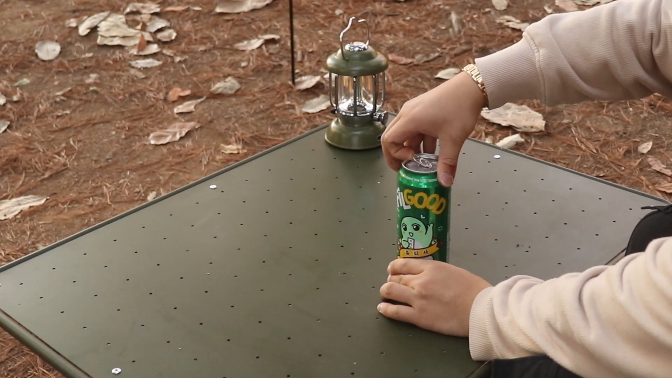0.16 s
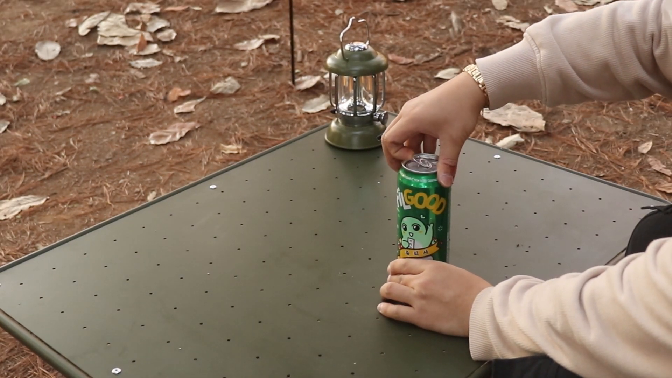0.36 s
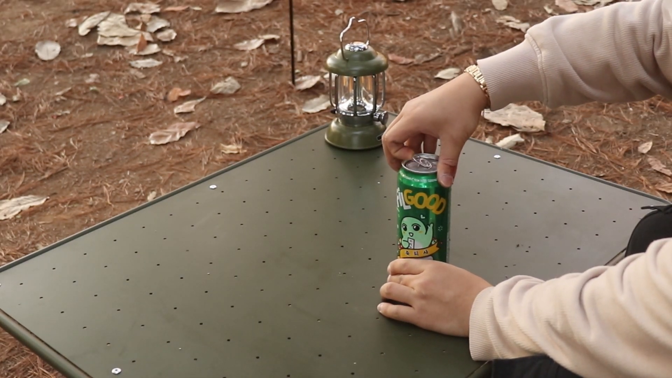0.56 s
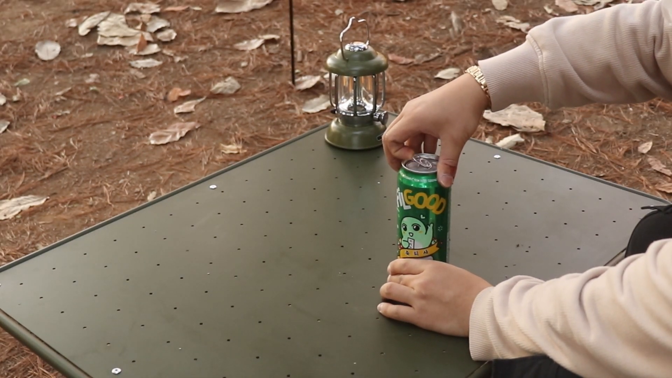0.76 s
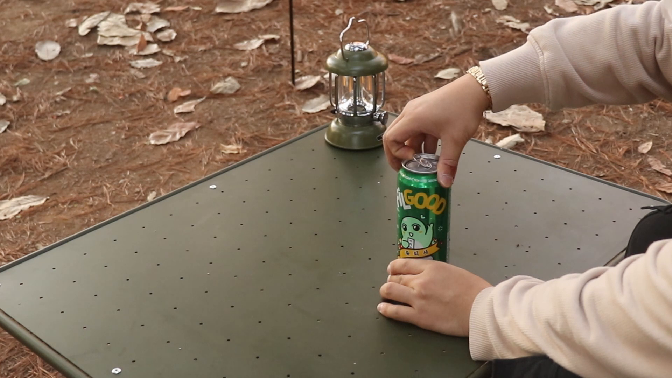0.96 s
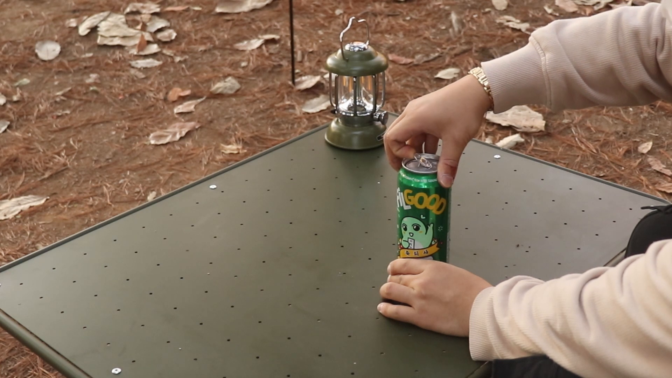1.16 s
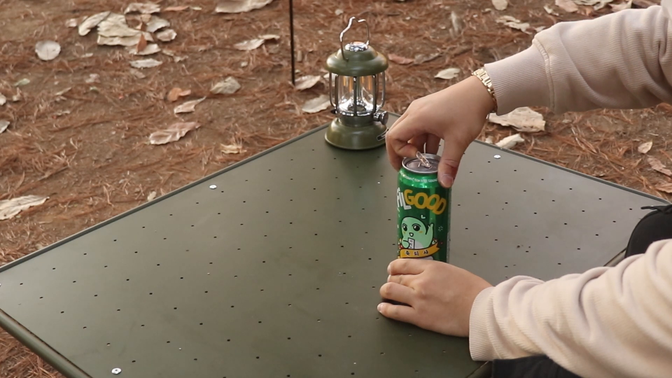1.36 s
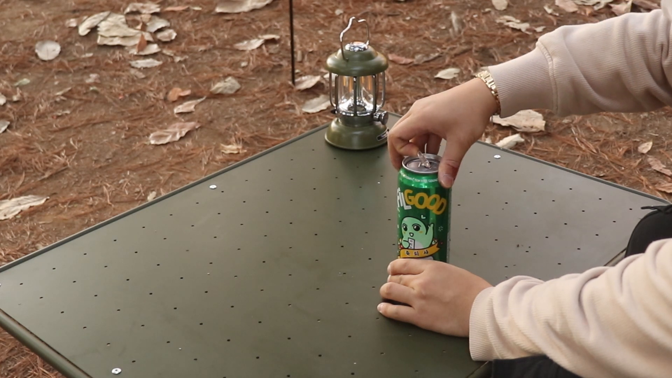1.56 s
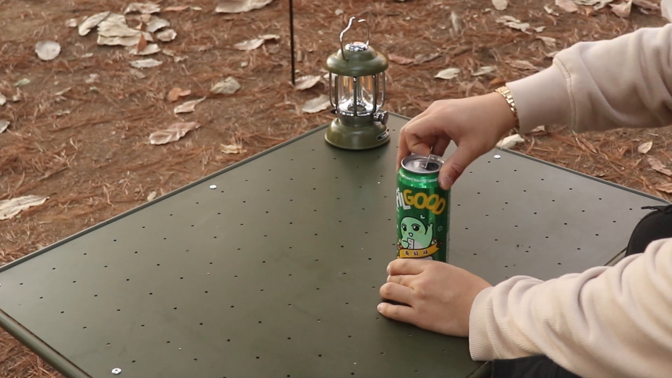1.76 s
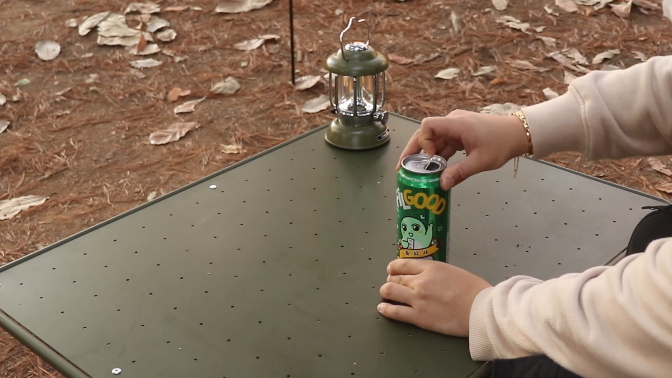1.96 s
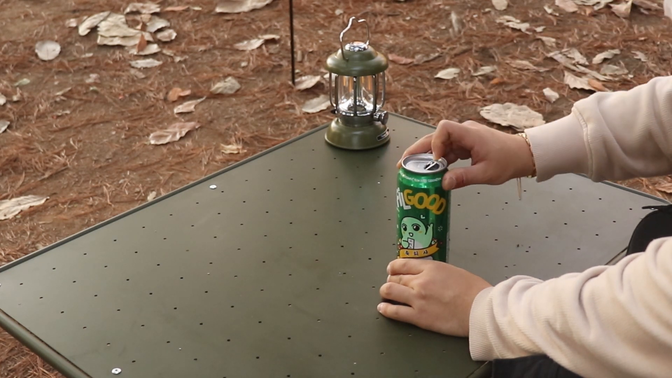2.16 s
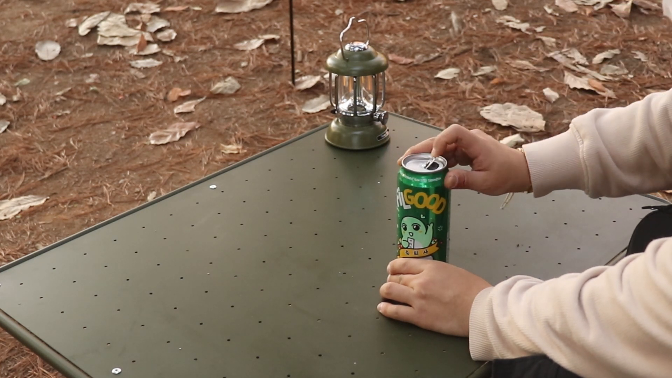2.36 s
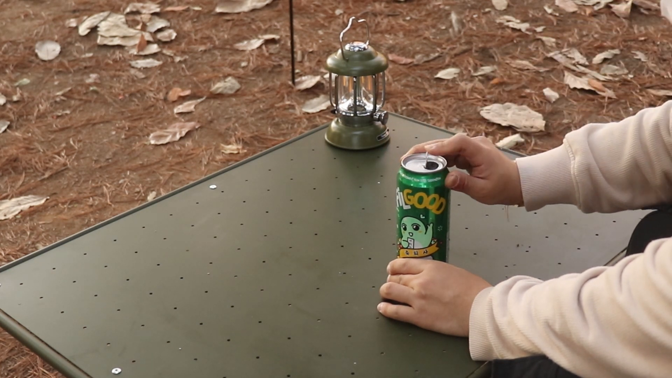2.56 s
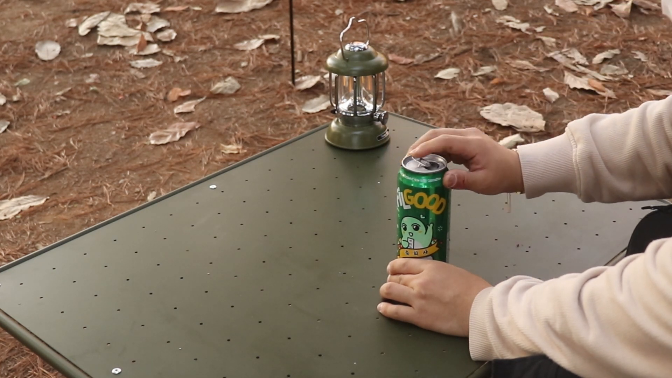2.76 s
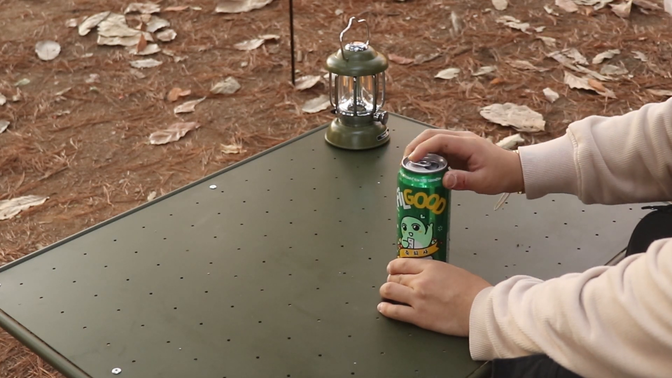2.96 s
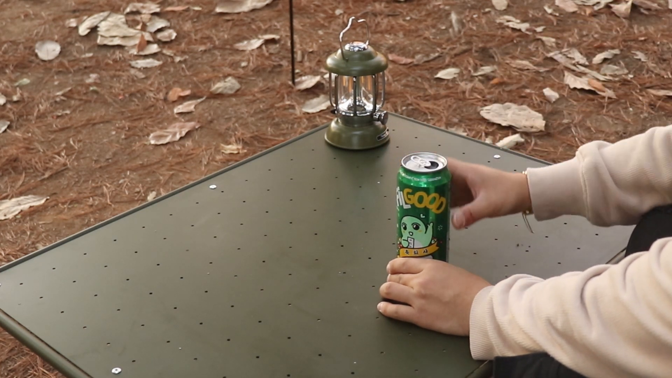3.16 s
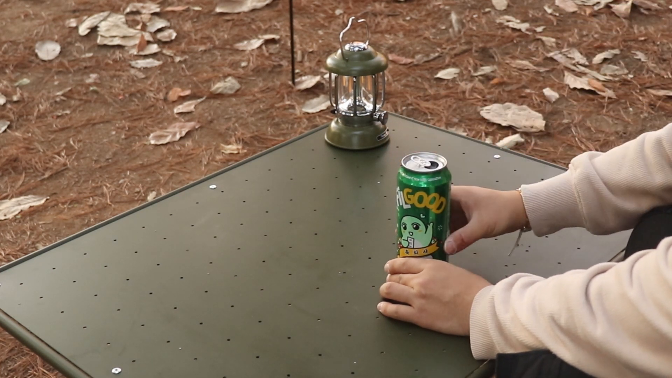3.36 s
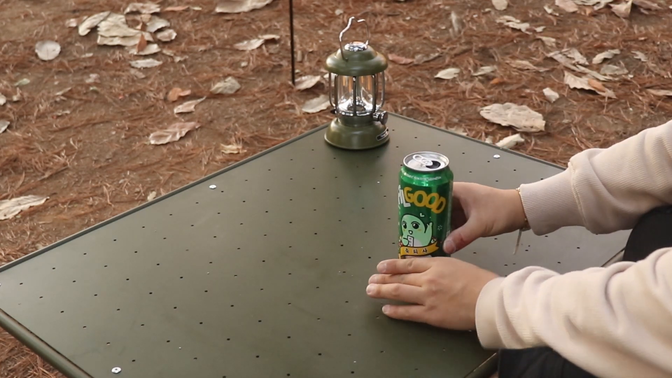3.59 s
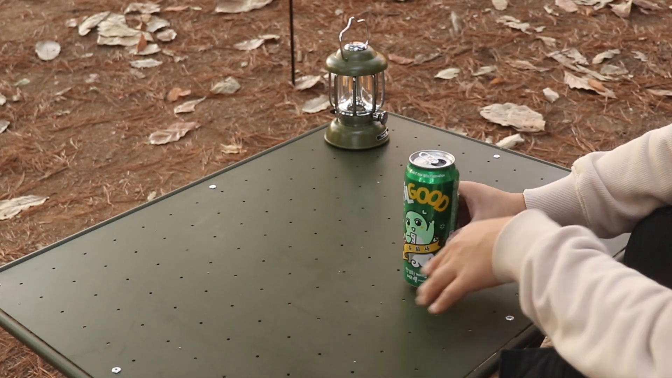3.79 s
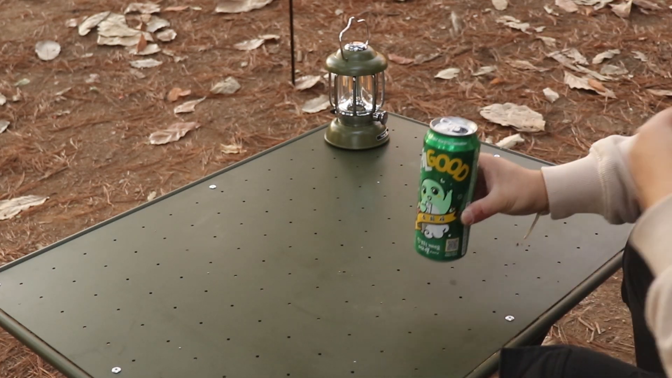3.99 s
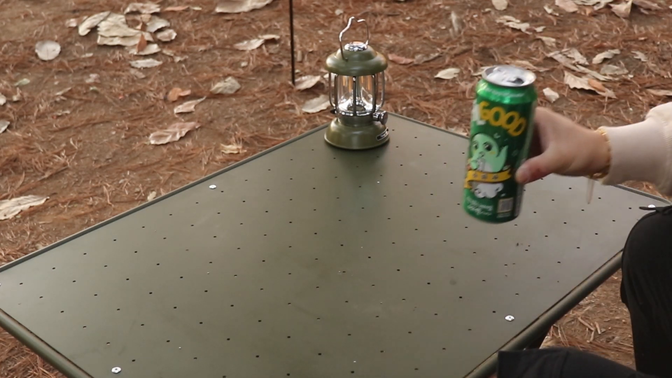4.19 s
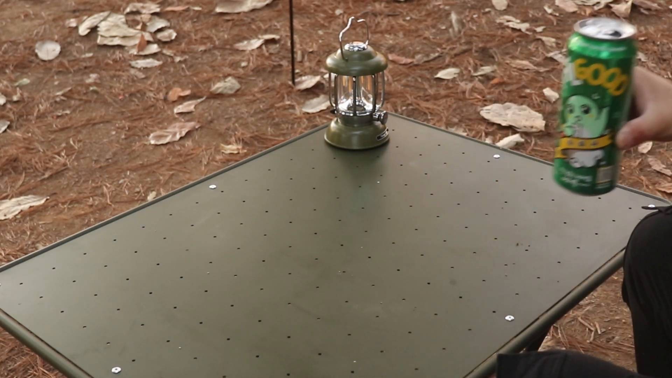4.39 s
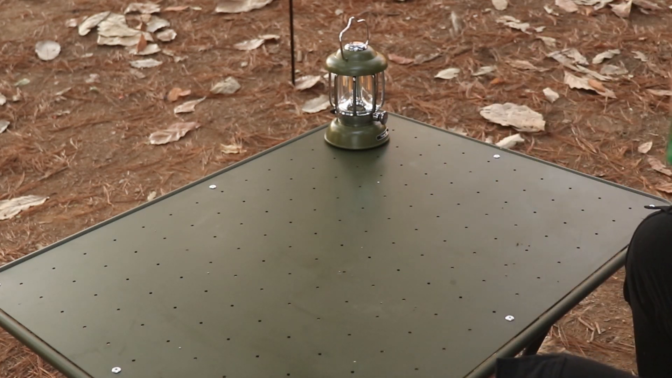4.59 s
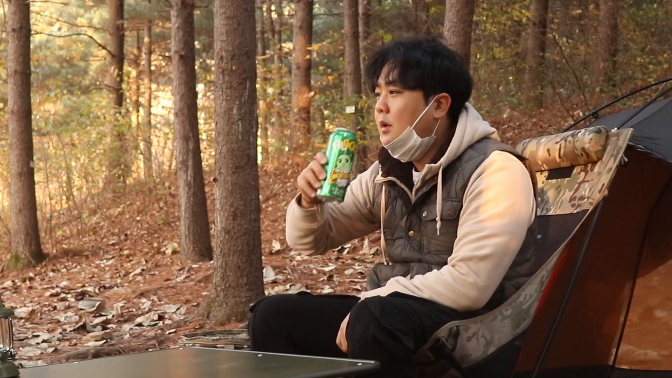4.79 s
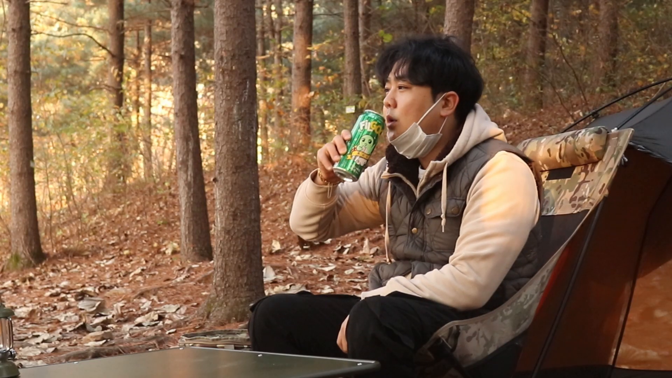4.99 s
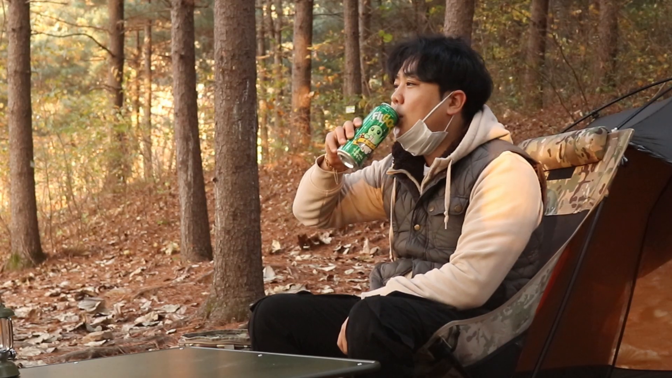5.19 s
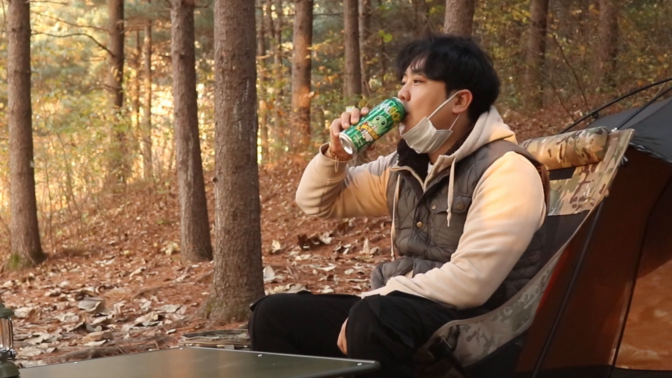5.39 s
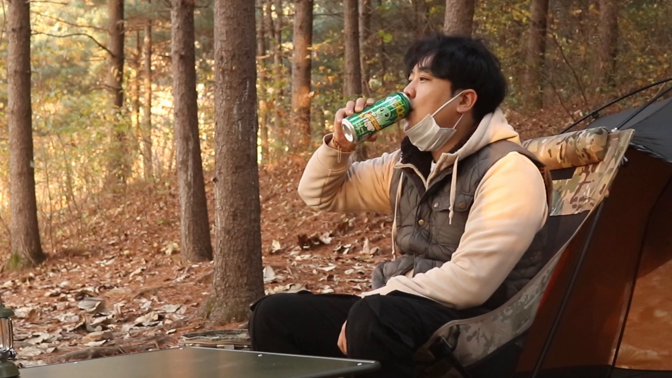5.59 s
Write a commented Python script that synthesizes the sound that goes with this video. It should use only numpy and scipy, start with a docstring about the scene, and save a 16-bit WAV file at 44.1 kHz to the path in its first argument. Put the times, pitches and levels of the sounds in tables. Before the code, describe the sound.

Close, dry can opening: short gas spurt and pop, metallic ticks, a second hard crack, then faint sleeve rustle and distant birds.

```python
"""A drink can is opened on a camp table in a pine wood: the seal cracks, gas hisses out and the lid pops.
Bursts of tiny fractures ring the lid, shaped noise makes the gas jet, and fading tones thump and ring.
The ring-pull ticks as it is levered up, the flap tears open, a sleeve rustles in soft noise, a fingertip knocks.
Small birds whistle gliding tones among echoing trees, over a distant rush and a breeze made of noise.
Near the end the sound cuts to a calmer background."""
import sys
import numpy as np
from scipy import signal
from scipy.fft import rfft, irfft
from scipy.io import wavfile

SR = 44100
rng = np.random.default_rng(int(sys.argv[2]) if len(sys.argv) > 2 else 0)


def store_wav(level_fs):
    """Save 16-bit WAV to argv[1]."""
    pcm = np.round(np.clip(np.atleast_2d(level_fs), -1, 1) * 32767)
    wavfile.write(sys.argv[1], SR, pcm.T.astype(np.int16))


N = 248724
TIME = np.arange(N) / SR


def from_db(db):
    """Turn decibels into a factor that multiplies the sound."""
    return 10 ** (np.asarray(db) / 20)


def rms_one(x):
    """Scale a sound to an average power of one."""
    return x / np.sqrt(np.mean(x ** 2) + 1e-20)


def curve(rows):
    """Join (time_s, value) rows by straight lines."""
    return np.interp(TIME, *np.transpose(rows))


def at_hz(points, hz):
    """Read a (pitch_hz, value) table between its points, with pitch on a log scale."""
    freqs, values = np.transpose(points)
    return np.interp(np.log(np.maximum(hz, 1)), np.log(freqs), values)


def add(out, start_s, sound):
    """Mix a sound in at its start time."""
    start = round(start_s * SR)
    out[start:start + len(sound)] += sound[:len(out) - start]


def fade(t, t60):
    """Die away smoothly, falling by 60 dB in t60 seconds."""
    return np.exp(-np.log(1000) * t / t60)


def noise(spectrum):
    """Steady noise of a given colour, with an average power of one."""
    hz = np.fft.rfftfreq(N, 1 / SR)
    colour = from_db(at_hz(spectrum, hz))
    return rms_one(irfft(rfft(rng.standard_normal(N)) * colour, N))


def bell(x, hz, width_hz, gain_db):
    """Boost or cut around one frequency."""
    band = signal.lfilter(*signal.iirpeak(hz, hz / width_hz, fs=SR), x)
    return x + (from_db(gain_db) - 1) * band


def shelf(x, hz, kind, gain_db):
    """Boost or cut the low or the high end."""
    end = signal.lfilter(*signal.butter(1, hz, kind, fs=SR), x)
    return x + (from_db(gain_db) - 1) * end


def low_pass(x, order, hz):
    """Remove the sound above one frequency."""
    return signal.sosfilt(signal.butter(order, hz, fs=SR, output="sos"), x)


# colour of the distant rush, before its treble is softened: pitch_hz, relative_level_db (per Hz)
RUSH_COLOUR = [(160, -1), (250, -4), (350, -3.5), (550, -0.5), (800, -1.5), (1050, -7.0), (1400, -13),
               (2000, -20.0), (3000, -20.5), (4500, -18.5), (6000, -25.5), (8000, -27), (10000, -33),
               (15000, -34)]


def distant_rush(level_db=-43.5, treble_db=-3.0):
    """A steady far-off noise with softened treble."""
    return from_db(level_db) * shelf(noise(RUSH_COLOUR), 8000, "high", treble_db)


# strength of the breeze on the microphone: time_s, level_db
BREEZE_LEVEL = [(0.0, -32.5), (0.05, -37), (0.43, -33.5), (1.35, -42.5), (1.48, -35), (2.6, -44),
                (2.69, -38), (4.45, -38.5), (4.65, -35.5)]
# colour of its rumble: pitch_hz, relative_level_db (per Hz)
BREEZE_COLOUR = [(12, -4.5), (22, 1.5), (48, -2.5), (70, -7.5), (110, -14), (160, -30.5), (300, -55)]


def breeze():
    """Moving air rumbles on the microphone as noise of changing level."""
    return from_db(curve(BREEZE_LEVEL)) * noise(BREEZE_COLOUR)


# colour of the background after the cut: pitch_hz, relative_level_db (per Hz)
LATE_COLOUR = [(30, -6.5), (80, 0.5), (130, -0.5), (210, 0.5), (320, -4.5), (520, -4.0), (820, -2),
               (1100, -10), (1500, -18.0), (2200, -27), (4000, -29), (6500, -32), (10000, -34.0),
               (15000, -34.5)]


def background(cut_s=4.67, late_db=-45.5):
    """Rush and breeze play until a cut, 10 ms long, to a calmer steady noise."""
    late = np.clip((TIME - cut_s) / .01, 0, 1)
    early_sound = distant_rush() + breeze()
    return (1 - late) * early_sound + late * from_db(late_db) * noise(LATE_COLOUR)


def glide(length_s, start_hz, end_hz, bend=1.1):
    """The pitch of one slurred bird note, moving along a slight bend."""
    return start_hz + (end_hz - start_hz) * np.linspace(0, 1, round(length_s * SR)) ** bend


# chirps slur up and flick back down: start_s, rise_s, top_pitch_hz, level_db, flick_level_db
# (bird levels are those before flutter, swell and distance)
CHIRPS = [(0.011, .075, 5050, -49.5, -57), (0.479, 0.081, 4800, -53.5, -58),
          (0.962, 0.072, 5580, -50, -52.5), (1.216, 0.078, 4900, -55, -60),
          (1.413, 0.076, 5600, -53.5, -58), (1.96, 0.076, 4800, -55.5, -60), (2.19, .052, 5500, -56, -64),
          (2.207, 0.06, 4850, -50, -49.5), (2.451, 0.031, 5430, -51.5, -66), (2.552, .06, 4750, -45.5, -57),
          (2.764, .072, 4850, -53, -59), (2.957, 0.057, 4810, -48, -48.5), (3.1, .058, 4550, -55.5, -60),
          (3.44, 0.066, 4860, -49, -48)]


def chirps(from_hz=3530, flick_s=.024, flick_ratio=.8):
    """Each chirp is a rising note, then a short flick down to a share of the top pitch."""
    rises = [(start_s, glide(rise_s, from_hz, top_hz), level_db)
             for start_s, rise_s, top_hz, level_db, _ in CHIRPS]
    flicks = [(start_s + rise_s, glide(flick_s, top_hz, flick_ratio * top_hz), flick_db)
              for start_s, rise_s, top_hz, _, flick_db in CHIRPS]
    return rises + flicks


# lone falling notes: start_s, length_s, start_pitch_hz, level_db
FALLING_NOTES = [(2.515, .028, 5100, -50.5), (3.645, 0.041, 5050, -43.5), (5.449, .1, 6800, -68.5)]


def falling_notes(end_ratio=.8):
    """Single notes slide down to a share of their starting pitch."""
    return [(start_s, glide(length_s, hz, end_ratio * hz), level_db)
            for start_s, length_s, hz, level_db in FALLING_NOTES]


# overtones of the long call: multiple_of_base_pitch, level_db
CALL_OVERTONES = [(2, -55.5), (3, -67)]
CALL_FROM_S, CALL_S, CALL_HZ, CALL_SAG_HZ_PER_S = 4.66, .16, 2025, 1250
CALL_DROP_S, CALL_DROP_HZ = .025, 500
TRILL_HZ, TRILL_DEPTH = 60, .015  # trills per second; share of the pitch


def long_call():
    """A trilled call sinks steadily and drops at its end; only its overtones sound."""
    t = TIME[TIME < CALL_S]
    drop = np.clip(1 - (CALL_S - t) / CALL_DROP_S, 0, 1)
    trill = 1 + TRILL_DEPTH * np.sin(2 * np.pi * TRILL_HZ * t)
    base_hz = (CALL_HZ - CALL_SAG_HZ_PER_S * t - CALL_DROP_HZ * drop) * trill
    return [(CALL_FROM_S, multiple * base_hz, level_db) for multiple, level_db in CALL_OVERTONES]


def birds(waver=0.009, flutter_db=4.0):
    """Birds whistle pure tones that waver in pitch, swell, flutter in level and fade."""
    out = np.zeros(N)
    wobble = noise([(200, -1.5), (700, -39.5)])
    flutter = noise([(90, -1), (350, -39.5)])
    for start_s, pitch, level_db in chirps() + falling_notes() + long_call():
        span = round(start_s * SR) + np.arange(len(pitch))
        hz = pitch * (1 + waver * wobble[span])
        swell = np.sqrt(np.abs(np.sin(np.linspace(0, np.pi, len(hz)))))
        loudness = swell * from_db(level_db + flutter_db * flutter[span])
        add(out, start_s, np.sqrt(2) * loudness * np.sin(2 * np.pi * np.cumsum(hz) / SR))
    return out


# how long the trees' echo takes to fall 60 dB: pitch_hz, fade_time_s
TREES_FADE = [(200, 0.3), (2000, 0.46), (4500, 0.34), (8000, 0.41), (14000, 0.06)]
# colour of the trees' echo: pitch_hz, relative_level_db
TREES_COLOUR = [(200, -3.5), (1000, -3.5), (2000, -2.5), (3200, -3.5), (4500, 3.5), (6500, -0.5),
                (8500, -5), (11000, -9), (16000, -8)]


def trees(x, build_s=0.0043, grain_db=1.5):
    """Trunks scatter sound back as a grainy tail whose highest treble dies first."""
    t = TIME[:SR * 2 // 3]
    edges = np.geomspace(120, 17000, 13)  # limits of the pitch bands, Hz
    grain = noise([(200, 2.5), (1000, -29.5)])[:len(t)]
    scatter = rng.standard_normal((2, len(t))) * from_db(grain_db * grain)
    tail = np.zeros(len(t))
    for k, (low, high) in enumerate(zip(edges, edges[1:])):
        band_filter = signal.butter(2, [low, high], "band", fs=SR, output="sos")
        band = signal.sosfilt(band_filter, scatter[k % 2])  # neighbours use different noise
        hz = np.sqrt(low * high)
        tail += band * from_db(at_hz(TREES_COLOUR, hz)) * fade(t, at_hz(TREES_FADE, hz))
    tail *= 1 - np.exp(-t / build_s)
    return signal.fftconvolve(x, tail / np.linalg.norm(tail))[:N]


# colour of the gas jet: pitch_hz, relative_level_db (per Hz)
JET_COLOUR = [(300, -23), (1000, -16.5), (2200, -10.5), (4000, -3), (5300, -8), (6450, 1), (7400, -5),
              (8350, 1), (10000, -3.5), (13500, 1), (16000, -4)]
# cuts that hollow out the jet: pitch_hz, width_hz, gain_db
JET_HOLLOWS = [(5850, 400, -17.5), (9020, 430, -19), (7550, 400, -4.5), (2630, 250, -6.5)]
GAS_FROM_S, GAS_UNTIL_S, GAS_DB = 0.1435, 0.243, -14
SLIT_OPENS_S, SLIT_NARROW_DB = .018, -7.5
GAS_SAG_DB_PER_S, GAS_RELEASE_T60_S = 85, .036


def gas(sputter_db=0.9):
    """Gas sputters through a widening slit, its pressure sags, and it dies once the lid has popped."""
    jet = noise(JET_COLOUR)
    for hz, width_hz, gain_db in JET_HOLLOWS:
        jet = bell(jet, hz, width_hz, gain_db)
    age = TIME - GAS_FROM_S
    slit_db = SLIT_NARROW_DB * np.clip(1 - age / SLIT_OPENS_S, 0, 1)
    pressure_db = GAS_DB - GAS_SAG_DB_PER_S * np.maximum(age - SLIT_OPENS_S, 0)
    sputter = sputter_db * noise([(150, 0), (900, -41)])
    flowing = (age > 0) * fade(np.clip(TIME - GAS_UNTIL_S, 0, 1 / 2), GAS_RELEASE_T60_S)
    return rms_one(jet) * flowing * from_db(pressure_db + slit_db + sputter)


def fractures(t60, share_db):
    """A sudden release and a dying run of tiny fractures, evened out over all pitches, then faded."""
    t = TIME[:SR // 5]
    force = rng.standard_normal(len(t)) * fade(t, t60)
    force *= from_db(share_db) / np.linalg.norm(force)
    force[0] += 1  # the sudden release
    even = irfft(np.exp(1j * np.angle(rfft(force))), len(t))
    return (even * fade(t, 5 * t60))[:len(t) // 2]


# ringing tones of the aluminium lid: pitch_hz, relative_level_db, fade_time_s (to fall 60 dB)
LID_TONES = [(705, -19.5, .012), (1020, -22, 0.034), (1800, -18, .03), (2047, -13.5, 0.032),
             (2310, -16, 0.015), (3120, -13, .016), (3390, -10.5, 0.0095), (3962, -12.5, .016),
             (4830, -8.5, .011), (6700, -12, 0.0085), (6940, -12, .009), (8120, -2.5, .013),
             (9400, -12, 0.0082), (11100, -11, .006), (11400, -7, .008), (13000, -13, 0.0046),
             (13700, -4, .006)]


def lid_ring():
    """A tap makes the thin lid ring at many pitches, each dying at its own speed."""
    t = TIME[:SR // 10]
    return sum(from_db(level_db) * fade(t, t60) * np.cos(2 * np.pi * hz * t)
               for hz, level_db, t60 in LID_TONES)


# longer and harder slips tear more: dB at 0 dB force and typical length; dB per dB of force
TEAR_DB, TEAR_TYPICAL_S, TEAR_FOLLOWS = 7.5, .005, 0.37


def snap(db, tear_t60, favoured_hz, width_hz, boost_db, bass_db, top_hz, ring_db, crack_db=7.5):
    """One burst of force on the metal reaches the air directly and also rings the lid."""
    length_db = 10 * np.log10(tear_t60 / TEAR_TYPICAL_S)
    force = fractures(tear_t60, TEAR_DB + length_db + TEAR_FOLLOWS * db)
    ring = signal.fftconvolve(force, lid_ring())[:len(force)]
    sound = from_db(crack_db) * force + from_db(ring_db) * ring
    # the place and tension of the contact favour one range
    sound = bell(sound, favoured_hz, width_hz, boost_db)
    sound = shelf(sound, 1200, "low", bass_db)
    # a blunt release lacks treble
    sound = low_pass(sound, 2, top_hz)
    attack = np.std(sound[:len(TIME[TIME < .003])])
    return -from_db(db) * sound / attack


# cracks and pops of the lid, and one dull fingertip knock (the last row): start_s,
# level_db (over the first 3 ms), burst_fade_s (to fall 60 dB), favoured_pitch_hz, favoured_width_hz,
# favoured_boost_db, bass_db, top_edge_hz
POPS_AND_KNOCK = [(0.1438, -8.5, 0.0047, 4350, 750, 15, -9, 15000),
                  (0.2087, -12, .005, 1850, 600, 19, -10, 4800),
                  (0.2290, -18.5, .005, 2100, 1400, 10.5, -5, 4000),
                  (0.2378, 1, .012, 1835, 330, 13, -12, 7200),
                  (1.7026, 6.5, .022, 3200, 1100, 14, 1.5, 13000),
                  (1.7225, -15.5, .009, 3000, 2000, 6, -3, 7500),
                  (3.0885, -38, 0.0054, 2750, 399, 29, -10, 3400)]


def pops_and_knock(ring_db=-20):
    """The lid cracks, pops or is knocked by a fingertip, and a pressing finger mutes its ring."""
    out = np.zeros(N)
    for start_s, *burst in POPS_AND_KNOCK:
        add(out, start_s, snap(*burst, ring_db))
    return out


# share of the sound that gets past the hand cupped over the lid, out to the trees: time_s, level_db
HAND_OPENNESS = [(0.3, -2.5), (1.2, -5), (1.68, -7), (1.7, 0)]


def past_the_hand(x):
    """The cupped hand holds back a changing share of the sound."""
    return x * from_db(curve(HAND_OPENNESS))


# single echoes: delay_s, level_db (before dulling)
ECHOES = [(.0055, -24), (0.0194, -32), (.0305, -32.5)]


def near_echoes(x, dull_hz=5000):
    """Ground and nearby surfaces return dull single echoes."""
    out, dull = np.zeros(N), low_pass(x, 2, dull_hz)
    for delay_s, level_db in ECHOES:
        add(out, delay_s, from_db(level_db) * dull)
    return out


# low thumps and a short 1 kHz ring as the can opens: start_s, pitch_hz, level_db (at the start),
# fade_time_s (to fall 60 dB)
OPENING_TONES = [(0.2373, 129, -23.5, 0.053), (0.2393, 210, -26, 0.031), (1.7025, 205, -30.5, 0.24),
                 (1.7031, 250, -27.5, 0.17), (1.7027, 988, -13.5, 0.062)]


def opening_tones():
    """Low thumps and a short 1 kHz ring sound as the can opens, each a fading pure tone."""
    out, t = np.zeros(N), TIME[:SR // 2]
    for start_s, hz, level_db, t60 in OPENING_TONES:
        add(out, start_s, from_db(level_db) * fade(t, t60) * np.sin(2 * np.pi * hz * t))
    return out


# rubs of sleeve and hand: start_s, length_s, level_db (before the swell), centre_pitch_hz, width_octaves
RUBS = [(0.599, 0.16, -50, 2470, 0.71), (0.92, .17, -56, 4970, 0.51), (3.16, 0.17, -57, 5470, 0.47),
        (3.5, 0.061, -46.5, 5730, 0.27), (3.568, 0.16, -52, 10900, 1.4), (3.56, 0.66, -51, 2360, 1.28),
        (3.833, 0.14, -54.5, 2360, 0.74), (4.149, 0.6, -54, 2700, 1.23), (4.34, 0.11, -60, 5000, 0.7)]


def rubs(grain_db=1.0):
    """Cloth and skin slide in smooth strokes made of fine catching fibres."""
    out = np.zeros(N)
    grain = noise([(200, -2), (1500, -30)])
    fibres = rng.standard_normal(N) * from_db(grain_db * grain)
    for start_s, length_s, level_db, centre_hz, octaves in RUBS:
        stroke = fibres[(TIME >= start_s) & (TIME < start_s + length_s)]
        hz = np.fft.rfftfreq(len(stroke), 1 / SR) + 1  # 1 Hz up, so that the log exists
        colour = np.exp(-.5 * (np.log2(hz / centre_hz) / octaves) ** 2)
        stroke = rms_one(irfft(rfft(stroke) * colour, len(stroke)))
        swell = np.sin(np.linspace(0, np.pi, len(stroke)))
        add(out, start_s, from_db(level_db) * stroke * swell)
    return out


# the ring-pull slips on its rivet: start_s, level_db (over the first 3 ms), slip_fade_s (to fall 60 dB),
# favoured_pitch_hz, favoured_boost_db
TICKS = [(1.285, -25, .012, 2000, 6), (1.2944, -6.5, 0.0055, 5000, 5), (1.315, -27, .032, 6800, 8),
         (1.322, -22.5, 0.0044, 6530, 18), (1.327, -20.5, 0.0044, 6300, 13),
         (1.5493, -14, 0.0033, 11000, 9), (1.5519, -9, 0.004, 3996, 17), (1.5524, -17, .004, 11450, 22),
         (1.5639, -25, .024, 3760, 8), (1.5884, -23, 0.0035, 8300, 5), (1.6028, -22.5, .004, 3372, 9),
         (1.6638, -22.5, 0.0037, 3400, 7), (1.873, -45.5, .003, 7500, 8), (2.9443, -30.5, 0.0025, 1300, 12)]
TICK_RING_DB, TICK_WIDTH_HZ, TICK_BASS_DB, TICK_TOP_HZ = -9.5, 400, -7, 16000
RING_MUTING = .22  # a harder pull damps the lid: dB of ring lost per dB of tick


def ticks():
    """The ring-pull slips in bright ticks that leave the lid freer to ring than the pops do."""
    out = np.zeros(N)
    for start_s, level_db, slip_t60, favoured_hz, boost_db in TICKS:
        ring_db = TICK_RING_DB - RING_MUTING * level_db
        tick = snap(level_db, slip_t60, favoured_hz, TICK_WIDTH_HZ, boost_db,
                    TICK_BASS_DB, TICK_TOP_HZ, ring_db)
        add(out, start_s, tick)
    return out


def scene():
    """The can is close and fairly dry; the birds are far off among the trees."""
    song = birds()
    can = gas() + pops_and_knock() + ticks()
    spilled = past_the_hand(can)
    near = can + near_echoes(spilled) + from_db(-22.5) * trees(spilled) + opening_tones() + rubs()
    far = from_db(-2.3) * song + from_db(-12.3) * trees(song)
    return (near + far + background())[None]


def record(dry):
    """The loudest peaks overload and flatten at 0.92; then the highest treble is cut."""
    clipped = np.clip(dry, -.92, .92)
    return low_pass(clipped, 20, 15900)


dry = scene()
out = record(dry)
store_wav(out)
```